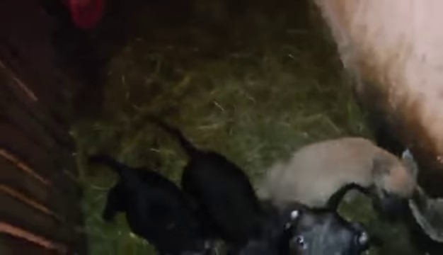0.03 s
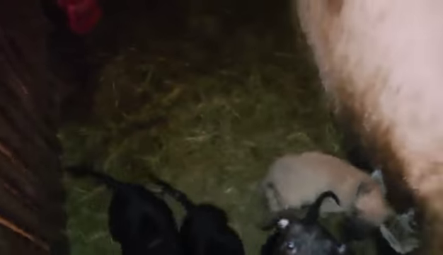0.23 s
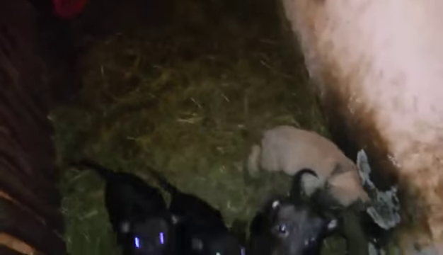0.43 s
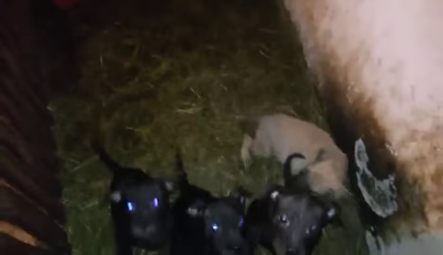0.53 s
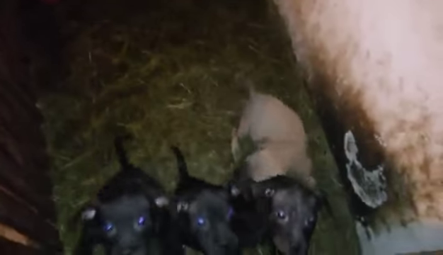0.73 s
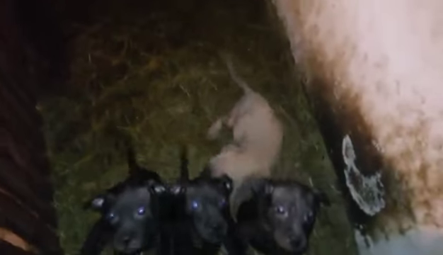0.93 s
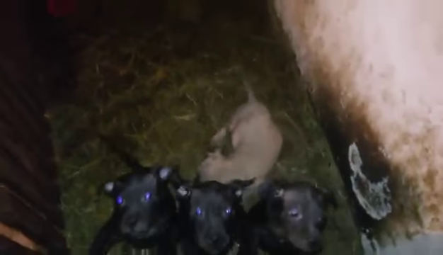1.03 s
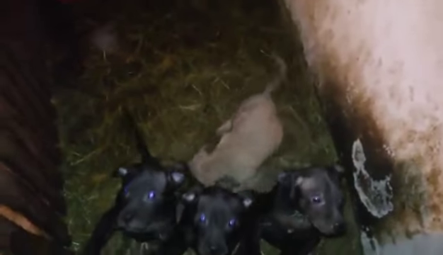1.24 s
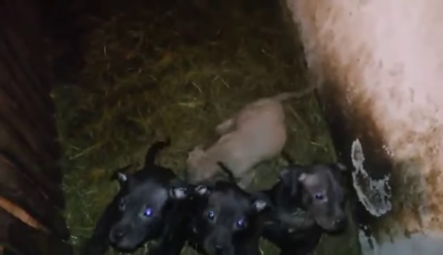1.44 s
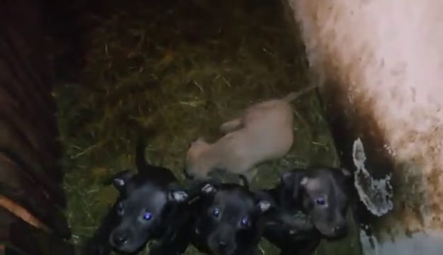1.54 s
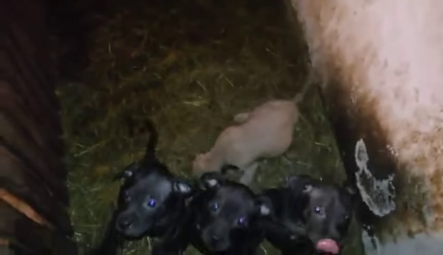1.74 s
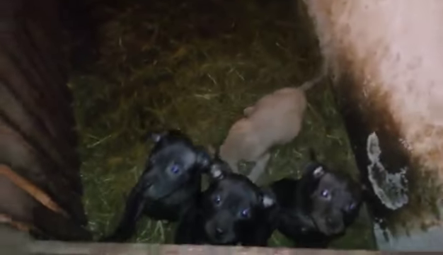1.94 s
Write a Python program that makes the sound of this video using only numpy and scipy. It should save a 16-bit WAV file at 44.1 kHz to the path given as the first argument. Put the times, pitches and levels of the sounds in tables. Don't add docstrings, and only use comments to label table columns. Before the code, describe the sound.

Close scratching of several puppies in a straw-bedded pen: brittle scrapes and crackles, soft body bumps on wood, faint floor rumble and one dull paw thump, in a short shed echo, picked up by a phone.

```python
import sys
import numpy as np
from scipy import signal
from scipy.io import wavfile
from scipy.ndimage import uniform_filter1d

SR = 44100
rng = np.random.default_rng(int(sys.argv[2]) if len(sys.argv) > 2 else 0)


def volts(x):
    e = np.asarray(x, float) / 20
    return 10 ** e


def wav_record(signal):
    frames = np.transpose(np.atleast_2d(signal))
    bounded = np.clip(frames, -1, 1)
    quanta = np.round(bounded * 32767).astype(np.int16)
    wavfile.write(sys.argv[1], SR, quanta)


N = 88200
TIME = np.arange(N) / SR

SCRAPE_STARTS = [0, .217, .30, .42, .503, .557, .656, .764, .783, .795, .921, .945, 1.066, 1.196, 1.331,
                 1.384, 1.43, 1.51, 1.55, 1.594, 1.673, 1.86, 1.953, 1.992]
# level/dB, ring f/Hz, hold t/s, treble level/dB
CLAW_SCRAPES = [(-36, 2060, 0.003, -2.5), (-25, 2120, 0.02, 0.5), (-40, 4300, 0.083, 10.5),
                (-40.5, 3800, 0.012, -7.5), (-42.5, 3300, 0.029, -4), (-36, 3700, 0.023, 0),
                (-36.5, 3380, 0.045, -5), (-31, 3100, .008, -2), (-20, 5070, 0.0034, 6.5),
                (-28.5, 3900, 0.013, -3.5), (-22, 3150, 0.04, 1.5), (-25, 3700, 0.026, 5.5),
                (-28.5, 3950, 0.013, 1), (-37.5, 2000, 0.016, -0.5), (-27.5, 3200, 0.018, 0),
                (-37, 3700, 0.027, -2), (-39, 4200, 0.076, 2), (-41.5, 3400, 0.026, 0),
                (-33.5, 3230, 0.014, -4.5), (-30, 3800, 0.025, -1), (-21.5, 4760, 0.017, -0.5),
                (-50.5, 4000, 0.026, -2), (-50, 5200, 0.012, -3), (-42, 2500, .01, -3.5)]
# f/Hz, level/dB per Hz
CLAW_SPECTRUM = [(500, -11), (1300, -9.5), (2200, -5), (3500, -2), (4600, -2.5), (6300, -8.5), (8600, -13),
                 (10500, -22.5), (15000, -30)]
# f/Hz, level/dB per Hz
STRAW_SPECTRUM = [(500, -7.5), (1400, -8), (2400, -9.5), (3700, -0.5), (5500, -7.5), (8700, -8.5),
                  (11000, -10.5), (15000, -20.5)]
# t/s, level/dB
STRAW_STIRRING = [(0, -34.5), (.08, -44.5), (.16, -40), (.21, -31.5), (.27, -33), (.34, -30.5), (.42, -40),
                  (.6, -38), (.76, -40.5), (.9, -37), (1.1, -46), (1.2, -39.5), (1.27, -47.5), (1.325, -50),
                  (1.36, -41.5), (1.45, -44.5), (1.6, -43), (1.75, -51), (1.85, -54.5), (2, -56)]
SNAP_STARTS = [.217, .508, .528, .691, .767, .784, .7955, .896, .9455, .946, 1.067, 1.348, 1.673, 1.678,
               1.6785, 1.704, 1.8598, 1.995, .7835, .797, .808, .818, .837, .855, .922, .927, .927, .961,
               .961, .969, .973, .975, 1.338, 1.3865, 1.5065, 1.551, 1.5942, 1.596, 1.596, 1.604, 1.608,
               1.606, 1.632, 1.673, 1.686, 1.679, 1.69, 1.73, .557]
# peak level/dB, f/Hz, length t/s
STALK_SNAPS = [(-16, 3640, 0.0047), (-36, 2360, 0.019), (-36, 3900, 0.0089), (-27, 3350, 0.0037),
               (-27, 3600, 0.0084), (-18, 3800, 0.0054), (-13.5, 4360, .007), (-28, 5700, 0.00034),
               (-13.5, 8600, 0.0023), (-21.5, 3620, 0.014), (-24.5, 3900, 0.0061), (-20, 3280, 0.0026),
               (-17.5, 5300, 0.0043), (-26.5, 1900, 0.011), (-11.5, 3500, 0.0053), (-33, 1950, 0.012),
               (-31.5, 1590, 0.0015), (-39.5, 3150, 0.0063), (-22.5, 7700, 0.0029), (-24, 5900, .005),
               (-24.5, 2120, 0.0028), (-28, 5100, .006), (-31, 4400, 0.0072), (-33.5, 4400, 0.0055),
               (-26, 4340, .005), (-24.5, 2940, 0.0089), (-28, 7400, 0.0027), (-22, 8400, .008),
               (-19.5, 4700, 0.0043), (-22, 4500, .003), (-24, 8000, .004), (-26, 3800, .005),
               (-28, 3340, .005), (-30, 3200, .004), (-29, 3160, 0.0045), (-35, 3230, 0.0088),
               (-25.5, 3130, 0.0044), (-26, 4100, 0.0046), (-36, 8100, .004), (-30, 5000, .004),
               (-24.5, 3700, .006), (-37, 7200, .006), (-38, 7800, 0.0017), (-24.5, 7100, 0.0027),
               (-15, 3700, 0.0025), (-22.5, 3000, 0.0052), (-26, 4800, .004), (-26, 3800, .004),
               (-35, 3300, .005)]
BUMP_STARTS = [.221, .224, .236, .28, .42, .6, .72, .763, .82, .88, .97, 1.2, 1.4, 1.59, 1.676, 1.859,
               1.955, .222, 1.73]
# level/dB, hold t/s, panel f/Hz
BODY_BUMPS = [(-32.5, 0.038, 740), (-36, 0.02, 355), (-34.5, 0.049, 96), (-39.5, .14, 284),
              (-40, 0.021, 376), (-52, 0.03, 190), (-45, 0.064, 51), (-37.5, 0.032, 485), (-36, 0.036, 170),
              (-43.5, 0.11, 41), (-34.5, 0.024, 390), (-41.5, 0.054, 270), (-43, 0.018, 79),
              (-48, 0.02, 146), (-40.5, 0.048, 330), (-50, 0.033, 196), (-53, 0.018, 270),
              (-30, 0.0089, 220), (-48.5, 0.018, 145)]
KNOCK_STARTS = [.2225, .229, .237, .243, .424, .437, 1.8605, 1.917, .226, .229, .262, .297, .268, .27]
# peak level/dB, board f/Hz, t60 t/s
PAW_KNOCKS = [(-25, 760, 0.074), (-25, 416, 0.066), (-21, 490, 0.075), (-29.5, 95.6, 0.25), (-39, 350, .04),
              (-33, 323, 0.048), (-36.5, 250, 0.2), (-41, 230, 0.052), (-27.5, 810, .06), (-26.5, 180, .06),
              (-30.5, 330, 0.13), (-31, 350, 0.21), (-32, 500, 0.12), (-28, 103, 0.13)]
# t/s, level/dB
FLOOR_TREAD = [(0.0, -45.5), (0.19, -47), (0.37, -41.5), (0.58, -44.5), (0.73, -42.5), (0.9, -39.5),
               (1.32, -49.5), (1.58, -48.5), (1.65, -49), (2.0, -55)]
# f/Hz, level/dB per Hz
FLOOR_SPECTRUM = [(15, -59), (25, -6.5), (93, 4.5), (183, -6.5), (219, 4), (270, -2.5), (303, -1.5),
                  (525, -11), (1200, -15), (1560, -49), (2640, -120)]


def unit(x):
    return x / np.sqrt(np.mean(x ** 2))


def curve(rows):
    return volts(np.interp(TIME, *np.array(rows).T))


def shade(rows, hz):
    table_hz, table_db = np.array(rows).T
    return np.interp(np.log(hz), np.log(table_hz), table_db)


def ring(x, hz, t60):
    r = np.exp(-np.log(1000) / (t60 * SR))
    resonator = [1, -2 * r * np.cos(2 * np.pi * hz / SR), r * r]
    return signal.lfilter([1, 0, -1], resonator, x) * np.sqrt((1 - r * r) / 2)


def swell(x, hz, t60):
    def twice(v):
        return ring(ring(v, hz, t60), hz, t60)
    return twice(x) / np.linalg.norm(twice(signal.unit_impulse(4096)))


def walk(rate):
    hold = int(SR / rate)
    levels = np.repeat(rng.standard_normal(N // hold + 1), hold)
    return uniform_filter1d(levels, hold)[:N]


def burst(start, hold, release, attack=0.0015):
    t = TIME - start
    return np.clip(t / attack, 0, 1) * np.exp(-np.clip(t - hold, 0, None) / release)


def slips(per_s=700, scatter_db=2.5):
    chance, sign, size = rng.random((3, N))
    clicks = (chance < per_s / SR) * np.sign(sign - 0.5)
    return unit(clicks * volts(-scatter_db * np.log(size + 0.0033)))


def scrape_effort():
    release_s = 0.017
    return np.array([volts(db) * burst(start, hold, release_s)
                     for start, (db, _, hold, _) in zip(SCRAPE_STARTS, CLAW_SCRAPES)])


def claw_drive(hz, effort):
    ring_db, ring_octaves, treble_hz = 5.5, 0.11, 7120
    _, pitch_hz, _, treble_db = np.array(CLAW_SCRAPES).T
    peak_db = ring_db * np.exp(-(np.log2(hz / pitch_hz) / ring_octaves) ** 2)
    tilt_db = treble_db * np.tanh(2 * np.log2(hz / treble_hz) + 1)
    return volts(shade(CLAW_SPECTRUM, hz)) * slips() * (volts(peak_db + tilt_db) @ effort)


def claws_and_straw():
    effort, stirring = scrape_effort(), curve(STRAW_STIRRING)
    claws, straw = 0, 0
    for hz in 500 * 2 ** np.arange(0, 4.9, 1 / 10):
        wide = np.sqrt(hz / 62000)
        t60 = 22 / hz
        claws = claws + wide * swell(claw_drive(hz, effort), hz, t60)
        grain = slips() + 0.78 * rng.standard_normal(N)
        patchy = volts(shade(STRAW_SPECTRUM, hz) + 2.2 * walk(24.93))
        straw = straw + wide * patchy * swell(grain * stirring, hz, t60)
    return claws + volts(-4.5) * straw


def ticks():
    tick_db, tick_s = -4, 0.0014
    touch = 0
    for start, (db, _, _, treble_db) in zip(SCRAPE_STARTS, CLAW_SCRAPES):
        touch = touch + volts(db + treble_db + tick_db) * burst(start, tick_s, tick_s)
    bright = signal.butter(1, [2500, 11000], "band", fs=SR)
    return signal.lfilter(*bright, rng.standard_normal(N) * touch)


def snaps():
    out = 0
    for start, (db, hz, length) in zip(SNAP_STARTS, STALK_SNAPS):
        t = 3 * np.clip(TIME - start, 0, None) / length
        roughness = 1 + 1.5 * uniform_filter1d(rng.standard_normal(N), size=40)
        tone = np.sin(2 * np.pi * hz * (TIME - start))
        out = out + volts(db) * t * np.exp(1 - t) * roughness * tone
    return out


def bumps():
    cycles, release_s = 5.1, 0.027
    out = 0
    for start, (db, hold, hz) in zip(BUMP_STARTS, BODY_BUMPS):
        push = rng.standard_normal(N) * burst(start, hold, release_s)
        thud = ring(push, hz, cycles / hz)
        out = out + volts(db) * signal.lfilter(*signal.butter(1, 2 * hz, fs=SR), thud)
    return out


def thump():
    start_s, level_db, pitch_hz, t60_s = 1.0505, -15, 87.5, 0.038
    t = np.clip(TIME - start_s, 0, None)
    sweep = 2 * np.pi * pitch_hz * (t + 0.0083 * (1 - np.exp(-t / 0.0019)))
    return volts(level_db) * np.sin(sweep) * np.exp(-np.log(1000) * t / t60_s)


def knocks():
    out = 0
    for start, (db, hz, t60) in zip(KNOCK_STARTS, PAW_KNOCKS):
        t = np.clip(TIME - start, 0, None)
        out = out + volts(db - 60 * t / t60) * np.sin(2 * np.pi * hz * t)
    return out


def floor_rumble():
    out = 0
    for hz in 30 * 2 ** np.arange(0, 5.4, 1 / 3):
        gain = np.sqrt(hz) * volts(shade(FLOOR_SPECTRUM, hz) + 2.9 * walk(13.85))
        out = out + gain * unit(ring(rng.standard_normal(N), hz, 7.2 / hz))
    return volts(-0.3) * unit(out) * curve(FLOOR_TREAD)


def shed(x):
    t60_s, treble_t60_s, level_db = 0.3, 0.13, -6.5
    t = TIME[:SR // 2]
    noise = rng.standard_normal(len(t))
    low = signal.lfilter(*signal.butter(1, 4500, fs=SR), noise)
    tail = low * volts(-60 * t / t60_s) + (noise - low) * volts(-60 * t / treble_t60_s)
    tail = tail * np.clip(t / 0.012, 0, 1)
    return volts(level_db) * signal.fftconvolve(x, tail / np.sqrt(np.sum(tail ** 2)))[:N]


def scene():
    rustle = claws_and_straw()
    cracks = snaps()
    echo = shed(rustle + volts(-6.5) * cracks)
    wood = bumps() + thump() + knocks() + floor_rumble()
    return (rustle + cracks + echo + wood + ticks())[None]


def thin_treble(x):
    masked_hz, masked_db, onset_rise_db, patchy_db, top_hz = 9000, -22, 9, 2.5, 15200
    hz, _, z = signal.stft(x, SR, nperseg=2048)
    hz = hz[:-1]
    power = np.abs(z[:1024]) ** 2
    bands = power.reshape(64, 16, -1).mean(axis=1)
    bands = bands * volts(2 * patchy_db * rng.standard_normal(bands.shape))
    bands = np.repeat(bands, 16, axis=0)
    middle = power[(hz > 2500) & (hz < 5000)].mean(axis=0)
    strong = bands > middle * volts(2 * masked_db)
    onset = middle > volts(2 * onset_rise_db) * np.roll(middle, 1)
    keep = (hz[:, None] < masked_hz) | strong | onset
    keep = keep & (hz[:, None] < top_hz)
    return signal.istft(z * np.vstack([keep, keep[-1:]]), SR, nperseg=2048)[1][:N]


def roll_off(x):
    return signal.sosfilt(signal.butter(12, 15270, fs=SR, output="sos"), x)


def record(dry):
    hiss = volts(-64.5) * signal.lfilter(*signal.butter(1, 9000, fs=SR), rng.standard_normal(N))
    low_cut = signal.butter(4, 50, "high", fs=SR, output="sos")
    heard = signal.sosfilt(low_cut, dry[0] + hiss)
    mix = thin_treble(heard)[None]
    return roll_off(mix)


dry = scene()
out = record(dry)
wav_record(out)
```